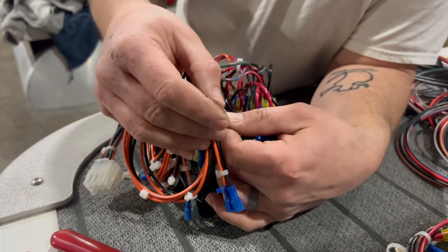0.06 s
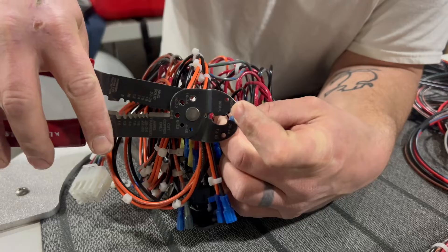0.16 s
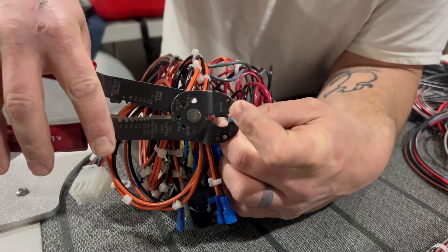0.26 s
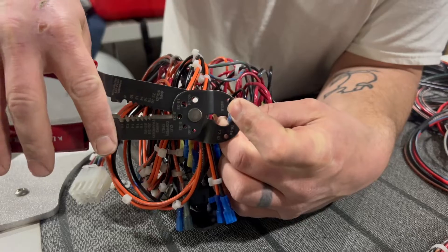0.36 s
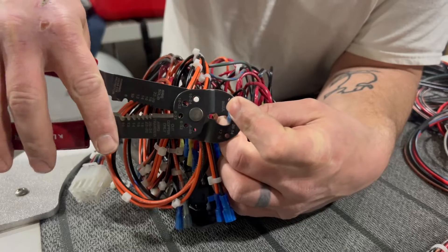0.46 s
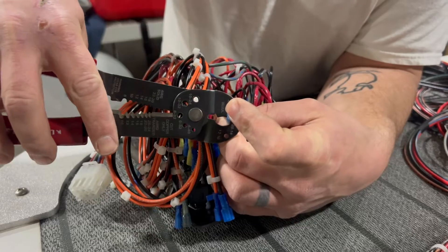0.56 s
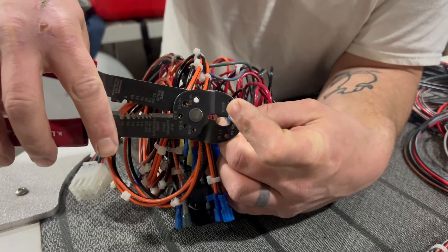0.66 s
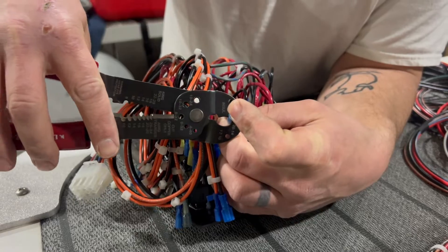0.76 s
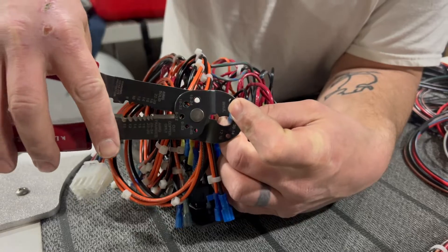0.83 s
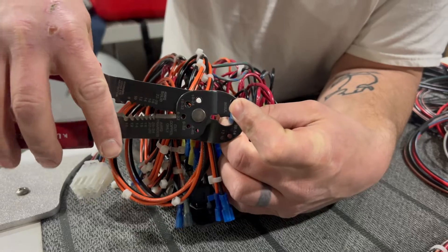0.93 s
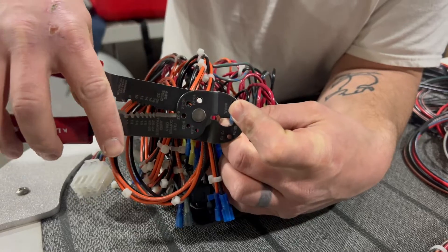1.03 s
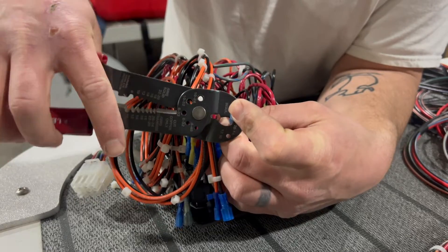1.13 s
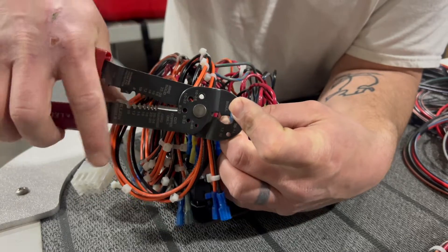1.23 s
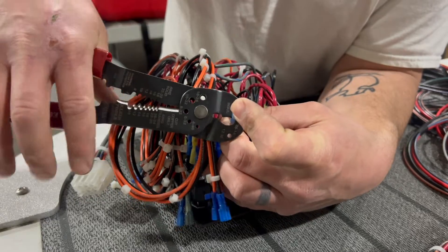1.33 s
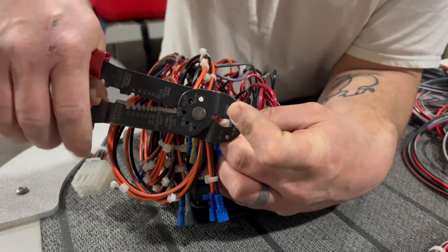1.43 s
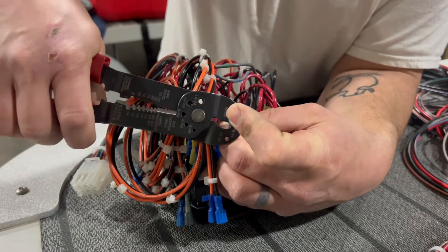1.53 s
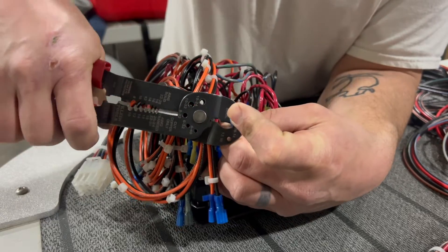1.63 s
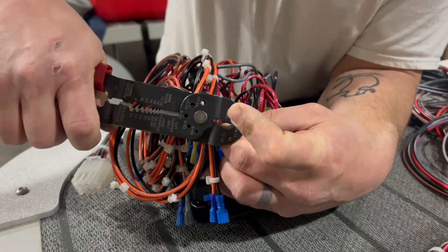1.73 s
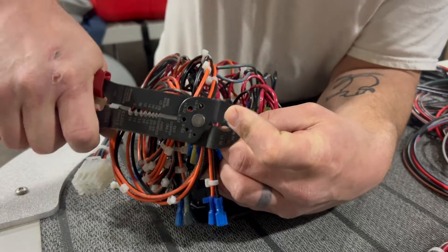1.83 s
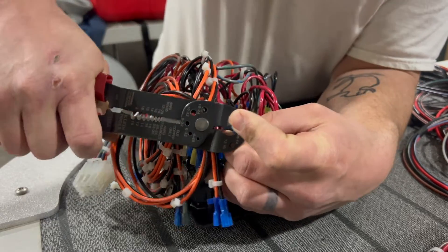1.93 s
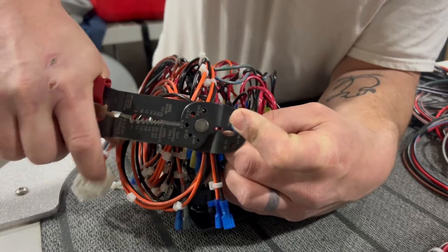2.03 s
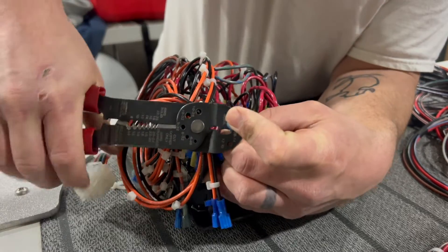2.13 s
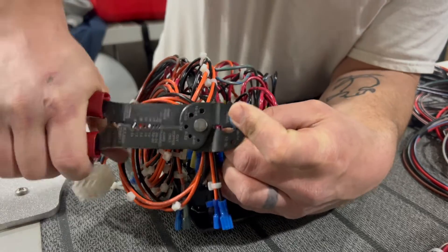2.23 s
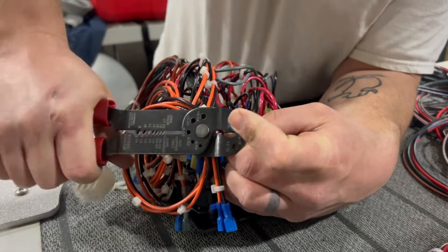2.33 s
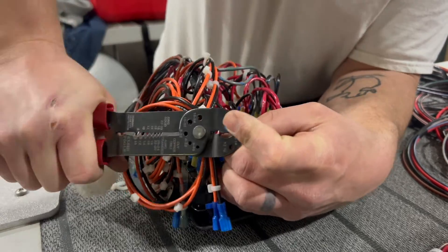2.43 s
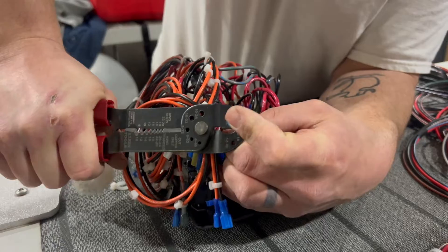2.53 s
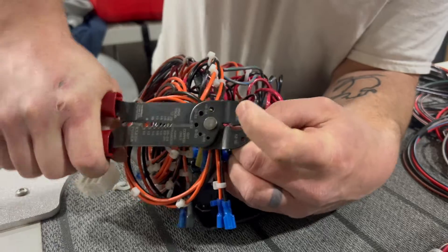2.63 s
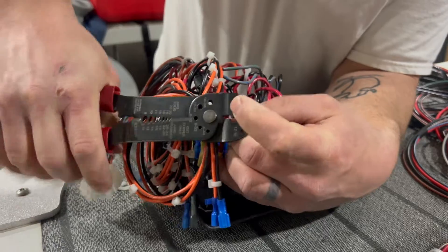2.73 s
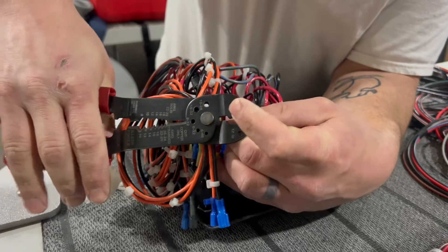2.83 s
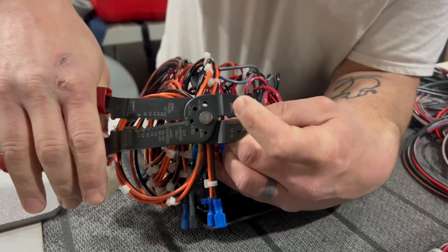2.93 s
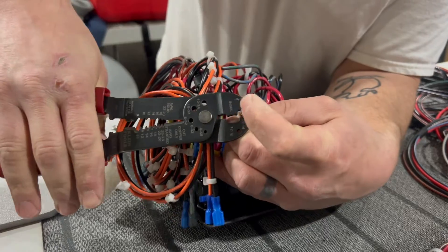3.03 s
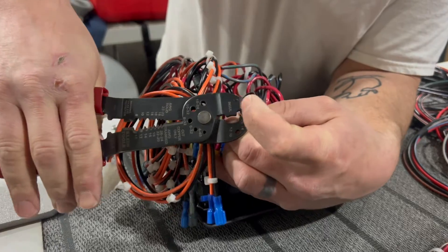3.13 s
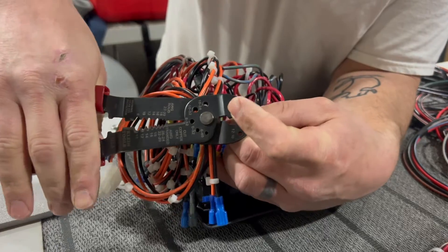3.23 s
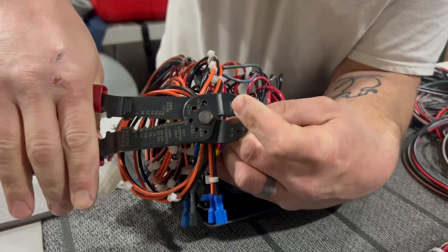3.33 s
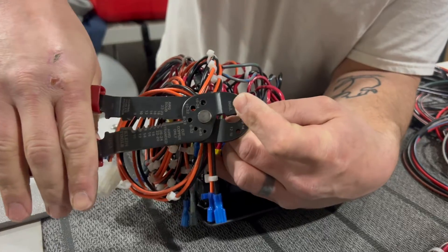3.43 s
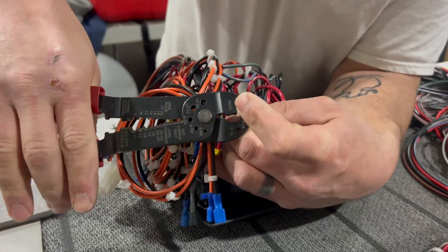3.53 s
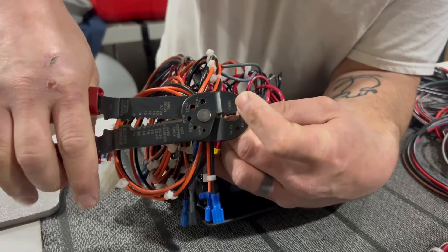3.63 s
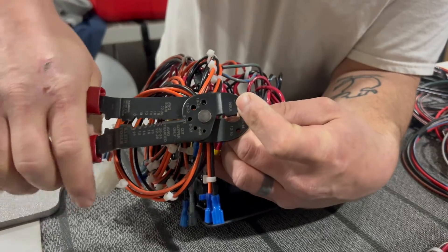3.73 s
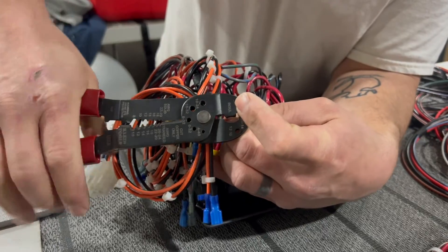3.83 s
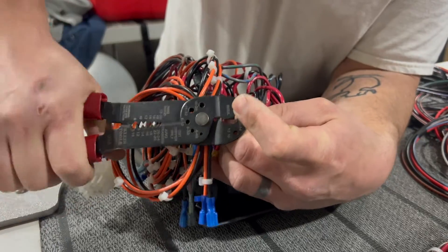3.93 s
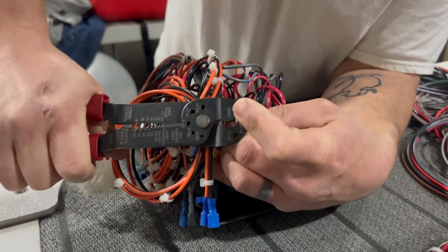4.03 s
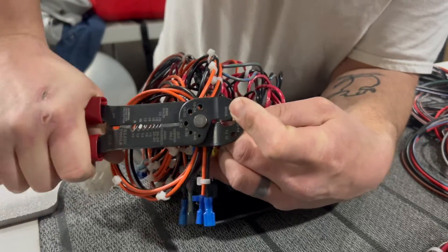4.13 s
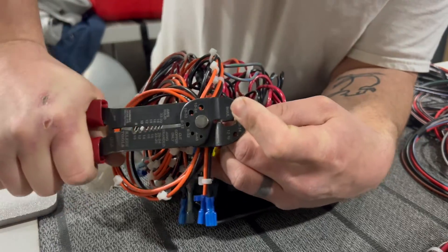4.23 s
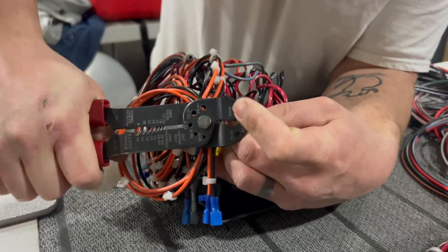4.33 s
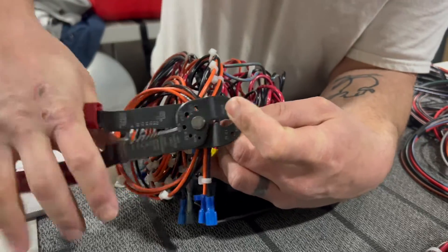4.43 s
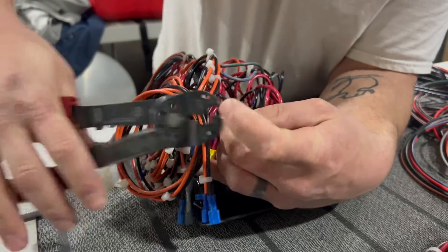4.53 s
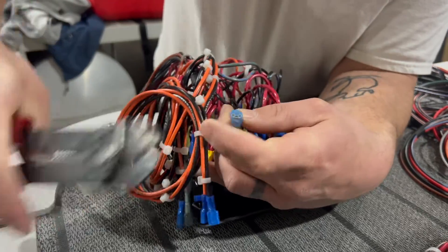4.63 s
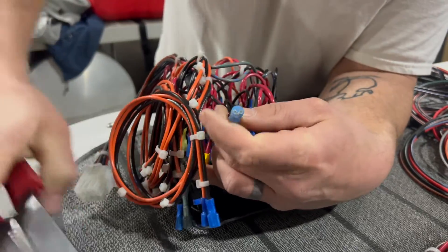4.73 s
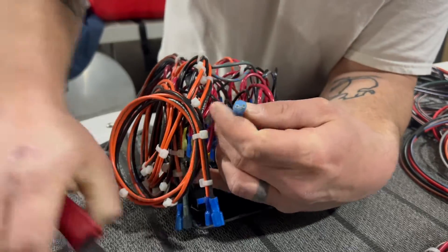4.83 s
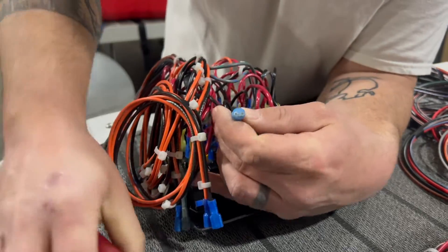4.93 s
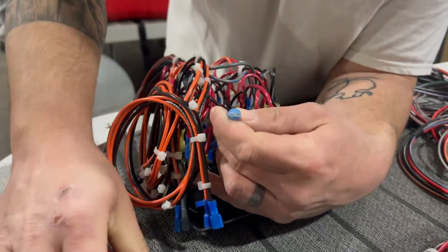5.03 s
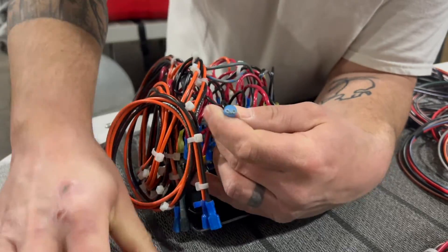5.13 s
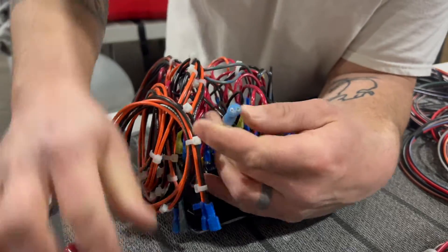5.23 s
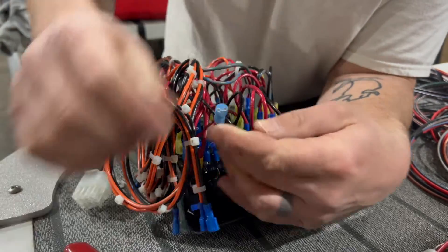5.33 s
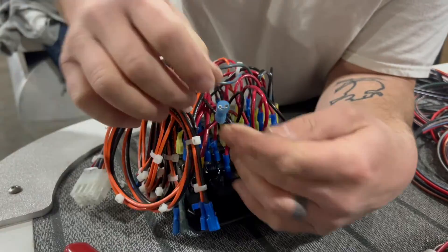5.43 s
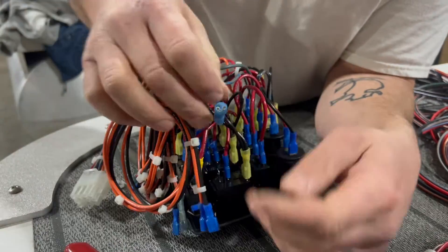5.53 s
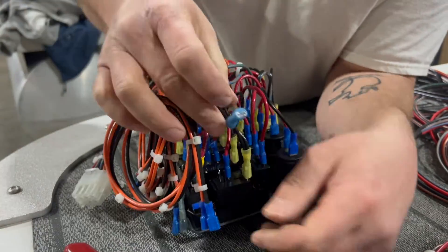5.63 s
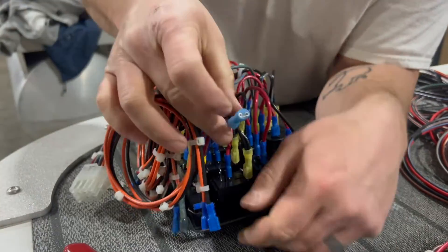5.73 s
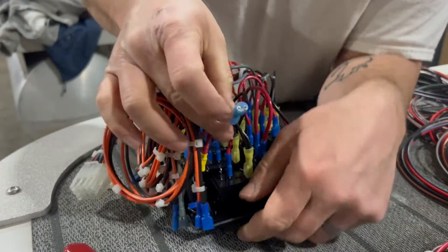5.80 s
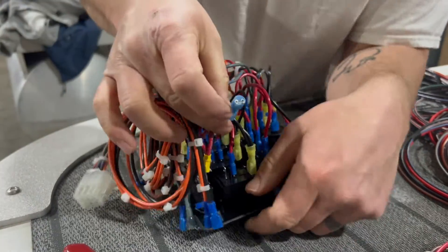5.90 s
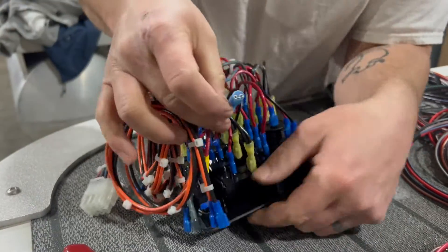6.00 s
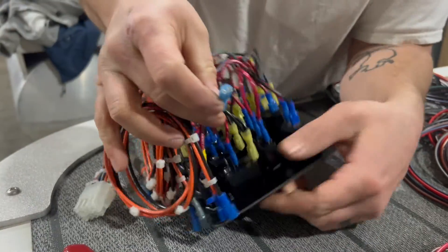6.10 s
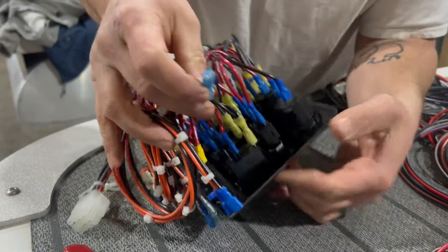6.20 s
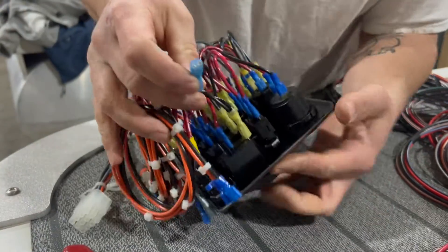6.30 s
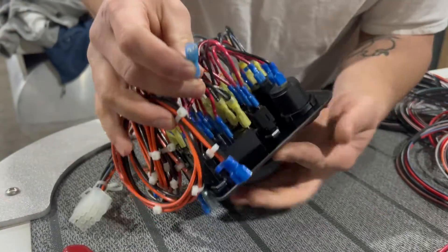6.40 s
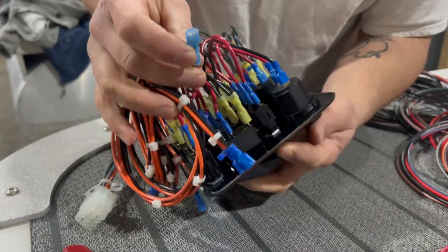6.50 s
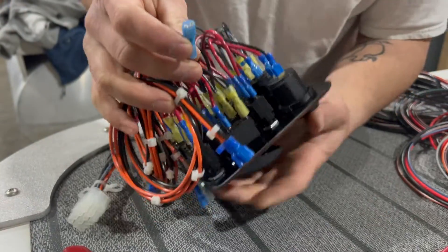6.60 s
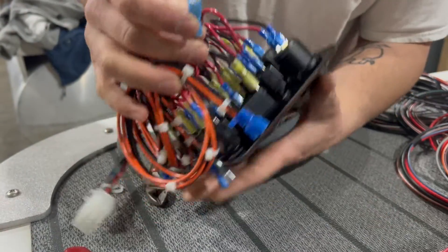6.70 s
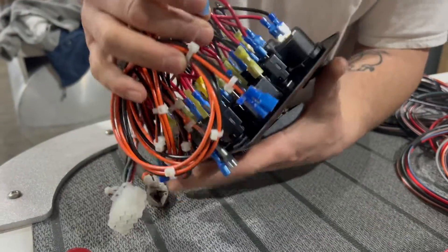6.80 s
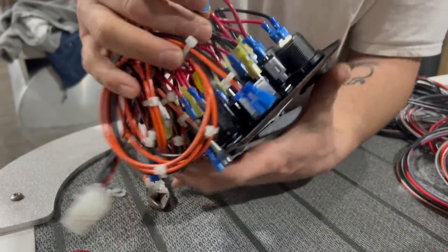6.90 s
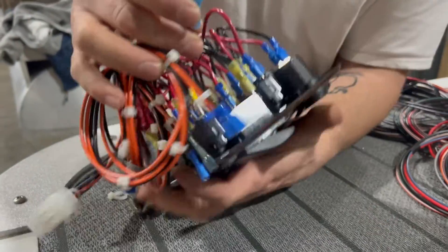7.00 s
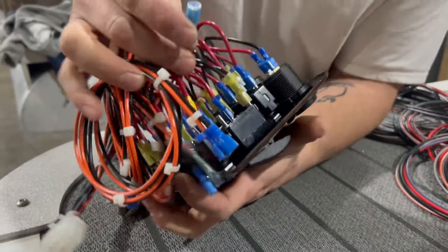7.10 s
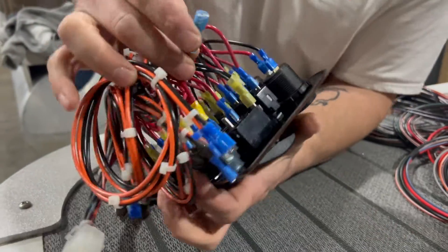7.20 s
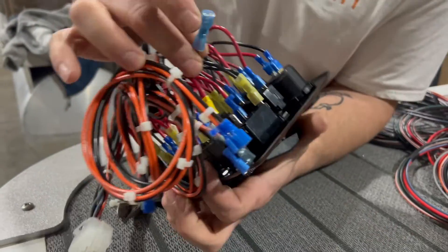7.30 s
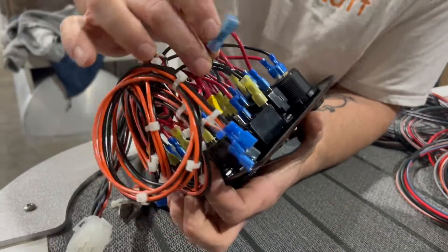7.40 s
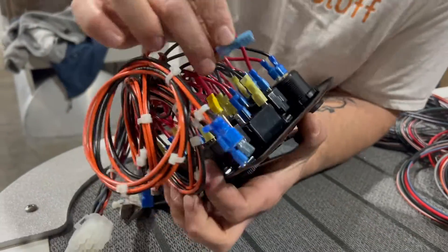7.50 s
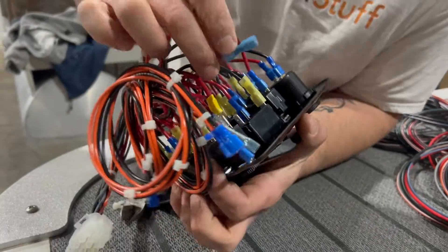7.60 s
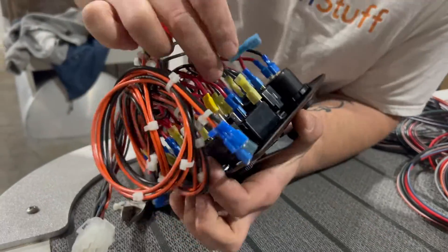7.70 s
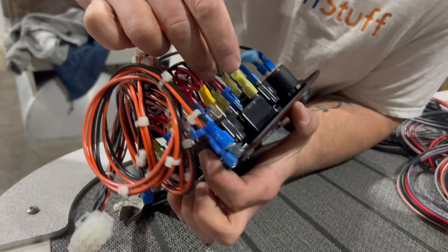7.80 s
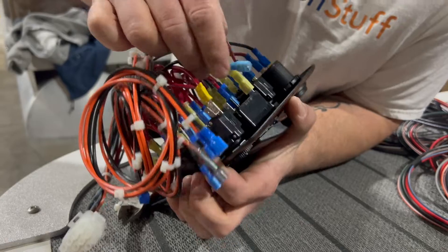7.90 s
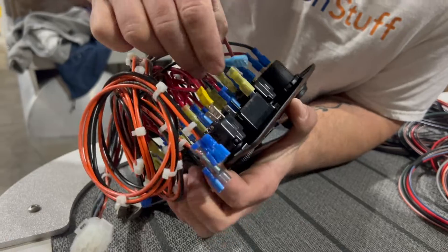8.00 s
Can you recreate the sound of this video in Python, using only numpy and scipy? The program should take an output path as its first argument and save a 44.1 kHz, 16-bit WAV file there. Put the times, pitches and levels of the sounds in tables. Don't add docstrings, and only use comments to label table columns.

```python
import sys
import numpy as np
from scipy import signal
from scipy.fft import rfft, irfft, next_fast_len
from scipy.io import wavfile
from scipy.ndimage import uniform_filter1d

SR = 44100
rng = np.random.default_rng(int(sys.argv[2]) if len(sys.argv) > 2 else 0)


def generate_wav(sig):
    pcm = np.round(np.clip(np.atleast_2d(sig).T, -1, 1) * 32767).astype(np.int16)
    wavfile.write(sys.argv[1], SR, pcm)


def gain_from_db(level_db):
    decades = np.asarray(level_db, float) / 20
    return 10 ** decades


N = 355181
PATCHY_DB = 1.5


def evened(x):
    return x / np.sqrt(np.mean(x ** 2) + 1e-20)


def peak_to_one(x):
    return x / abs(x).max()


def read(points, hz, axis=1):
    table = np.transpose(points)
    return np.interp(np.log(hz + 1), np.log(table[0] + 1), table[axis])


def add(mix, s, sound):
    part = mix[:, round(s * SR):][:, :sound.shape[1]]
    part += sound[:, :part.shape[1]]


def noise(colour, patchy_db, size=N):
    hz = np.fft.rfftfreq(1024, 1 / SR)
    a, b, c, d, patches = rng.standard_normal((size // 256 + 5, 513, 5)).T
    patches = uniform_filter1d(patches, size=12, axis=0)
    patches = evened(uniform_filter1d(patches, size=10, axis=1))
    level = gain_from_db(read(colour, hz)[:, None] + patchy_db * patches)
    z = np.array([a + 1j * b, c + 1j * d]) * level
    return evened(signal.istft(z, nperseg=1024, noverlap=768)[1][:, :size])


# f/Hz, likeness of diffuse sound [0-1], likeness of near sound [0-1], left-right balance level/dB
PORTS = [(60, 1, 0.57, 1), (150, 0.99, 0.94, -7.5), (303, 0.6, 0.85, 1), (690, 0.13, 0.2, 2),
         (1510, 0.2, 0.7, 0.5), (2380, 0, 0.9, -0.5), (4950, 0, 0, 3.5), (7840, 0, 0.2, 2),
         (9500, 1, 0.97, -1), (16000, .95, .95, -1)]


def ports(pair, hz, axis):
    same = np.clip(read(PORTS, hz, axis), 0, 1)
    treble = 1 / (1 + np.exp((8300 - hz) / 250))
    late = np.exp(-2j * np.pi * hz * 0.0003964)
    early = np.exp(2j * np.pi * (hz - 12050) / 3700)
    turn = (1 - treble) * late + treble * early
    right = same * pair[0] * turn + np.sqrt(1 - abs(same * turn) ** 2) * pair[1]
    tilt = gain_from_db(read(PORTS, hz, axis=3) / 2)
    return np.array([pair[0] * tilt, right / tilt])


def mode(hz, f, width, order):
    return -1j * ((1 + 2j * (hz - f) / width) ** -order - (1 + 2j * (hz + f) / width) ** -order)


def hits(rows, modes, split_hz, rough, fall_s, lag_turns, top_hz, pan_db, order, size):
    out, hz, t = np.zeros((2, N)), np.fft.rfftfreq(size, 1 / SR), np.arange(size) / SR
    lag = np.exp(-2j * np.pi * (lag_turns * np.log(1 + 8 * hz / split_hz) + hz * 20 / SR))
    lag /= (1 + 1j * hz / top_hz) ** 2
    push = np.exp(-t / fall_s) / np.sqrt(fall_s * SR / 2)
    fade = np.cos(np.pi / 2 * np.arange(size) / size)
    for s, db, low_db in rows:
        detune = rng.uniform(0.926, 1.015, (2, len(modes)))
        shapes = [gain_from_db(g) * mode(hz, f * d[:, None], w, order) for (f, w, g), d in zip(modes, detune.T)]
        shapes[::2] = [-h for h in shapes[::2]]
        drive = lag * (1 + rough * rfft(push * rng.standard_normal((2, size))))
        low = sum(h for h, m in zip(shapes, modes) if m[0] < split_hz)
        high = sum(h for h, m in zip(shapes, modes) if m[0] >= split_hz)
        low = peak_to_one(irfft(ports(drive * low, hz, axis=2)))
        high = peak_to_one(irfft(ports(drive * high, hz, axis=2)))
        add(out, s, gain_from_db(db) * (high + gain_from_db(low_db) * low) * fade)
    return out * gain_from_db([[pan_db / 2], [-pan_db / 2]])


# f/Hz, time to fall by 60 dB t/s
ROOM = [(100, 0.46), (500, 0.48), (2000, 0.34), (6000, 0.21), (16000, 0.04)]


def room(x):
    hz, t, z = signal.stft(rng.standard_normal((2, SR // 2)), SR, nperseg=256)
    tail = signal.istft(z * gain_from_db(-60 * t / read(ROOM, hz)[:, None]), SR, nperseg=256)[1]
    tail[:, :150] = 0
    return signal.fftconvolve(x, tail / np.linalg.norm(tail[0]), axes=1)[:, :N]


# t/s, level/dB
SWELL = [(0, 0.5), (.5, 0), (2, 0.5), (4, 1), (5.3, 2.5), (6.44, 3.5), (6.47, -7.5), (6.49, 2.5), (8.05, 1)]


def swell():
    return gain_from_db(np.interp(np.arange(N) / SR, *np.transpose(SWELL)))


# f/Hz, level/dB per Hz
AIR = [(13, -32.5), (22, 3.5), (48, 3), (93, -8), (130, -4), (157, -12), (323, -16), (381, -19.5),
       (611, -24), (702, -23.5), (806, -24.5), (2650, -36.5), (4130, -40.5), (6610, -42), (16500, -76.5)]


def fan_air():
    return gain_from_db(-43) * swell() * noise(AIR, patchy_db=-0.26)


# f/Hz, level/dB, speed of wavering f/Hz
HUM = [(34.6, -57.5, 1), (46.3, -49, 1.79), (67, -51.5, 1.8), (117.7, -51.5, 0.46), (131.84, -48.5, 0.43),
       (198.5, -64.5, 0.85), (236.4, -73, 1)]


def hum():
    t, out = np.arange(N) / SR, np.zeros(N)
    slow_t = t[::441]
    for hz, db, waver_hz in HUM:
        rate, phase, turn = rng.random((3, 8, 1))
        drift = np.exp(2j * np.pi * (waver_hz * (2 * rate - 1) * slow_t + phase)).sum(0) / np.sqrt(8)
        drift = np.interp(t, slow_t, drift.real) + 1j * np.interp(t, slow_t, drift.imag)
        tone = np.exp(2j * np.pi * (hz * t + turn[0]))
        out += gain_from_db(db) * evened(((1 + 0.35 * drift) * tone).real)
    return swell() * out * gain_from_db([[.1], [.9]])


def strokes(rows, rest_db):
    t = np.arange(0, N + 64, 64) / SR
    level = sum(gain_from_db(db - 17 * abs(2 * (t - s) / length) ** 1.3) for s, length, db in rows)
    return np.interp(np.arange(N) / SR, t, level + gain_from_db(rest_db))


# middle t/s, length t/s, level/dB
RUB = [(.22, 0.22, -74), (1.33, .3, -79), (1.96, 0.74, -71), (2.84, 0.5, -64), (4.23, 0.34, -76),
       (4.43, 0.11, -60), (4.76, 0.13, -63), (5.03, 0.33, -67), (5.29, 0.058, -65.5), (5.69, 0.18, -58.5),
       (5.81, 0.079, -59), (5.88, 0.046, -72), (5.94, .05, -75), (6.17, 0.044, -48), (6.3, 0.075, -56),
       (6.4, 0.13, -58.5), (6.51, 0.02, -60), (6.71, 0.077, -54), (6.92, 0.11, -82), (6.99, .04, -60),
       (7.07, .1, -64), (7.16, 0.12, -61), (7.5, 0.75, -76)]
# f/Hz, level/dB
RUB_COLOUR = [(3000, -43), (6000, -8), (9000, -2.5), (12000, -8.5), (15200, -10.5), (15900, -3),
              (16200, -41)]
# middle t/s, length t/s, level/dB
SCRAPE = [
    (.15, .9, -64.5),
    (1.55, 0.53, -60.5),
    (1.82, 0.37, -53),
    (2.9, 0.66, -65.5),
    (4.15, 0.48, -56),
    (5.25, .5, -56),
    (5.92, 0.54, -51.5),
    (6.95, 0.81, -62),
]
# f/Hz, level/dB
SCRAPE_COLOUR = [(150, -24), (350, 6), (800, 2.5), (1600, 1), (2100, -0.5), (2550, 1.5), (3100, -5),
                 (5000, -7.5), (7500, -10.5), (10000, -32)]


def rustle():
    catches = gain_from_db(2.56 * rng.exponential(1, N)) * (rng.random(N) < 900 / SR)
    catches = uniform_filter1d(catches, size=60)
    grain = evened(1 + 0.29 * evened(catches))
    rub = strokes(RUB, rest_db=-93.5) * noise(RUB_COLOUR, patchy_db=7.5)
    scrape = strokes(SCRAPE, rest_db=-61.5) * noise(SCRAPE_COLOUR, PATCHY_DB)
    return grain * (rub + scrape)


# t/s, peak level/dB, low body level/dB
TICKS = [(0.1694, -51, -11), (0.2024, -47.5, -4), (4.5594, -57, 2), (5.46, -53.5, 4), (5.8162, -37, -13),
         (5.8254, -48, -20), (5.8644, -41.5, 2), (5.9299, -45.5, 0), (6.0024, -70.5, 34), (6.1684, -34, 5),
         (6.1854, -39, -14), (6.2876, -47, -16), (6.5056, -47, 3), (7.0748, -37.5, 8), (7.0944, -47.5, -3),
         (7.7794, -56, -10)]
# f/Hz, width f/Hz, level/dB
PANEL = [(1510, 280, 4), (1730, 200, 3.5), (2190, 580, -0.5), (3480, 370, 1.5), (4100, 340, -0.5),
         (5900, 600, -4.5), (6560, 570, -4.5), (8340, 670, -8.5), (11800, 2600, -18), (14900, 1300, -22)]


def panel_ticks():
    return gain_from_db(3.5) * hits(TICKS, PANEL, split_hz=3000, rough=4.0, fall_s=0.0084, lag_turns=2.2,
                           top_hz=43200, pan_db=-2.0, order=1, size=2048)


SQUEEZES = [
    [1.6204, 1.6302, 1.6566, 1.6731, 1.6935, 1.7175, 1.7429, 1.7654, 1.7838, 1.8018, 1.8203, 1.8407, 1.8662],
    [2.2904, 2.2972, 2.3064, 2.3156, 2.3251, 2.3381, 2.3535, 2.3725, 2.3935, 2.4244],
    [3.9868, 4.0008, 4.0118, 4.0233, 4.0402, 4.0617, 4.0836, 4.1066, 4.132],
]
# full-load peak level/dB, first slip weaker by level/dB, loading time t/s, low body level/dB
GRIPS = [
    (-19.5, 26, 0.11, -22),
    (-26, 20, 0.013, -12.5),
    (-25.5, 14, 0.017, -14),
]
# t/s, peak level/dB, low body level/dB
STRAY_SLIPS = [
    (1.1822, -51, -13),
    (1.2645, -38.5, -24),
    (1.3184, -52, -22),
    (1.4661, -35.5, -26),
    (1.4724, -36.5, -12),
    (1.9994, -32, -17),
    (2.4014, -41, -15),
    (2.4144, -52, -21),
    (2.6524, -42, -10),
    (3.922, -41, -28),
]


def slips():
    rows = list(STRAY_SLIPS)
    stick_s = 0.023
    for times, (full_db, weaker_db, load_s, low_db) in zip(SQUEEZES, GRIPS):
        s = np.array(times)
        stuck = np.diff(s, prepend=s[0] - stick_s)
        db = full_db - weaker_db * np.exp((s[0] - s) / load_s) + 2 * np.log2(stuck / stick_s)
        rows += [(a, b, low_db) for a, b in zip(s, db)]
    return sorted(rows)


# f/Hz, width f/Hz, level/dB
PIVOT = [(900, 480, 11), (1970, 390, 11), (3500, 900, -1.5), (5060, 1050, -5), (6450, 550, 2.5),
         (7280, 630, 2), (8720, 1360, 2.5), (10380, 920, -2.5), (13040, 2900, 1.5), (14900, 3500, -6),
         (15580, 2300, 0.5)]


def pivot_creak():
    return gain_from_db(4.5) * hits(slips(), PIVOT, split_hz=3016.0, rough=.65, fall_s=.0025, lag_turns=2.0,
                           top_hz=39700, pan_db=2.0, order=2, size=1024)


# t/s, peak level/dB, low body level/dB
WIRES = [(4.3674, -45, -20), (4.4159, -39.5, -20), (4.4764, -47, -22), (4.6804, -51, -5.5),
         (6.5264, -50.5, -12), (6.9331, -42, -20), (6.9494, -44, -20), (7.0449, -35, -2),
         (7.1566, -39, -20), (7.6794, -56, -12)]


def wire_snaps():
    return hits(WIRES, PIVOT, split_hz=2460, rough=0.86, fall_s=.003, lag_turns=1.5,
                top_hz=31000, pan_db=4.0, order=1, size=1024)


# t/s, peak level/dB, low body level/dB
SPRING = [
    (4.6999, -15, -24),
    (4.7114, -48, -15),
    (4.7204, -39, -23),
    (4.7364, -47, -18),
]
# f/Hz, width f/Hz, level/dB
STOP = [(1280, 700, -9), (2190, 310, -4), (3220, 620, -7.5), (4920, 530, 3), (5640, 380, -15),
        (6980, 720, 2.5), (8100, 550, -7), (9400, 660, 1), (11700, 1600, -7), (14300, 1800, -8)]


def spring_open():
    return gain_from_db(4.5) * hits(SPRING, STOP, split_hz=2300, rough=0.98, fall_s=0.0022, lag_turns=3.3,
                           top_hz=41000, pan_db=3.0, order=2, size=2048)


def wiring_jolt():
    return hits(SPRING, PANEL, split_hz=3000, rough=2.5, fall_s=.004, lag_turns=1.5,
                top_hz=29800, pan_db=4.0, order=1, size=2048)


def blows(rows, modes):
    split = [(s, db + sharp_db, -sharp_db) for s, db, sharp_db in rows]
    return gain_from_db(4.5) * hits(split, modes, split_hz=270, rough=.25, fall_s=0.0029, lag_turns=0.16,
                           top_hz=1510, pan_db=0.0, order=1, size=8192)


# t/s, peak level/dB, sharpness level/dB
THUDS = [
    (4.999, -16.5, -6.5),
    (5.035, -23, -23),
    (5.145, -18, -0.5),
    (5.157, -25.5, 6),
    (5.17, -17.5, -11),
    (5.181, -25.5, 1),
    (5.196, -21.5, -8.5),
]
# f/Hz, width f/Hz, level/dB
BENCH = [(81.4, 24, -1.5), (111.6, 12, 8.5), (170, 19, 2.5), (223, 25, 3), (324, 59, -2.5), (346.3, 11, 8),
         (474, 86, 1), (546, 100, -2.5), (656, 37, 2), (830, 65, -7.5), (1210, 69, -7)]


def bench_thuds():
    return blows(THUDS, BENCH)


# t/s, peak level/dB, low body level/dB
CLANKS = [(4.9998, -27, -3), (5.0074, -37.5, -14), (5.0325, -44, -4.5), (5.1442, -27, -23),
          (5.1518, -15, -26.5), (5.1566, -13, -33), (5.1621, -18, -26), (5.167, -21.5, -13),
          (5.1791, -17, -13), (5.1901, -22.5, -24.5), (5.2002, -30.5, 3)]
# f/Hz, width f/Hz, level/dB
STEEL = [(1430, 910, 3.5), (3000, 500, -3), (3730, 380, 1), (4880, 480, 3.5), (6650, 260, 3),
         (8580, 510, -3.5), (10430, 1500, -8), (13180, 1100, -6), (14400, 660, -15.5)]


def steel_clanks():
    return gain_from_db(5.0) * hits(CLANKS, STEEL, split_hz=2300, rough=2.5, fall_s=0.0039, lag_turns=2.45,
                           top_hz=41800, pan_db=0.5, order=1, size=2048)


# f/Hz, level/dB
CHATTER_COLOUR = [(300, -18.5), (700, 8.5), (2000, 2), (4700, -11.5), (8500, -3.5), (12000, -5.5),
                  (15800, -6.5), (16500, -35.5)]


def chatter():
    t, shake, out = np.arange(SR // 5) / SR, np.zeros((1, SR // 2)), np.zeros((2, N))
    start = min(CLANKS)[0]
    swing = np.exp(-t / 0.0092) - np.exp(-t / 0.0041)
    for s, db, _ in CLANKS:
        add(shake, s - start, gain_from_db(-7 + 1.12 * db) * swing[None])
    add(out, start, shake * noise(CHATTER_COLOUR, 2 * PATCHY_DB, size=SR // 2))
    return out


# t/s, peak level/dB, sharpness level/dB
BUMPS = [
    (5.795, -47.5, 5.5),
    (5.819, -49.5, 11),
    (5.941, -42.5, -1),
    (5.999, -34.5, -4),
    (6.169, -38.5, 2),
    (6.2, -31.5, -6),
    (7.044, -37.5, -5),
    (7.066, -30.5, -2),
    (7.09, -35, -15),
]
# f/Hz, width f/Hz, level/dB
PLATE = [(90.6, 33, -12), (189, 41, -23.5), (269.7, 55, -7), (358, 29, 6.5), (418, 41.4, 3),
         (486, 69, -0.5), (706, 57, -5), (890, 250, -15)]


def panel_bumps():
    return blows(BUMPS, PLATE)


def scene():
    creak = pivot_creak()
    spring = spring_open()
    tool = steel_clanks() + panel_ticks() + wire_snaps()
    jolt = wiring_jolt()
    bench = bench_thuds() + panel_bumps()
    far = chatter() + fan_air() + rustle()
    far += room(gain_from_db(-19.0) * tool + gain_from_db(-12.5) * bench + gain_from_db(-31.0) * creak + gain_from_db(-24) * jolt)
    size = next_fast_len(N + 4096)
    far = irfft(ports(rfft(far, size), np.fft.rfftfreq(size, 1 / SR), axis=1), size)[:, :N]
    return creak + spring + tool + bench + far + hum()


def low_pass(x):
    return signal.sosfilt(signal.butter(12, 17010, fs=SR, output="sos"), x)


def record(dry):
    cut = signal.sosfilt(signal.butter(6, 35, "high", fs=SR, output="sos"), dry)
    cut = signal.sosfilt(signal.cheby2(8, 45, 16900, fs=SR, output="sos"), cut)
    return low_pass(cut)


dry = scene()
out = record(dry)
generate_wav(out)
```